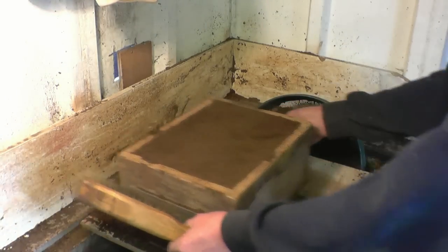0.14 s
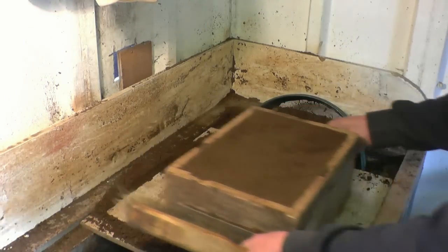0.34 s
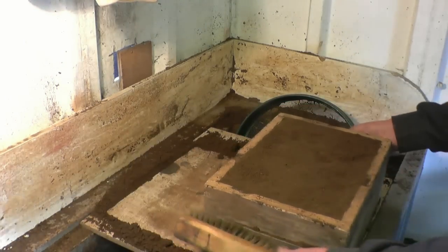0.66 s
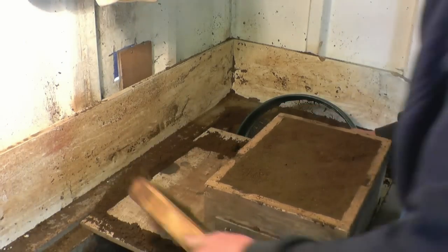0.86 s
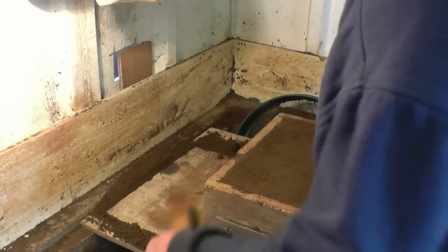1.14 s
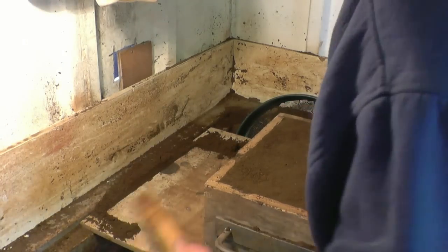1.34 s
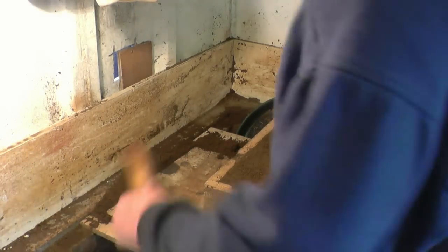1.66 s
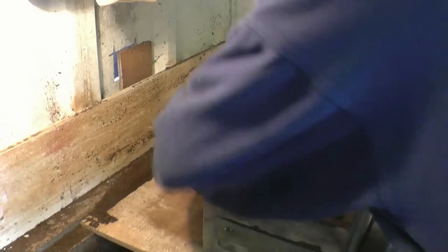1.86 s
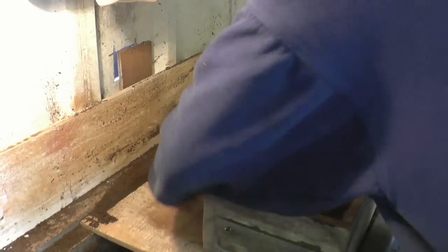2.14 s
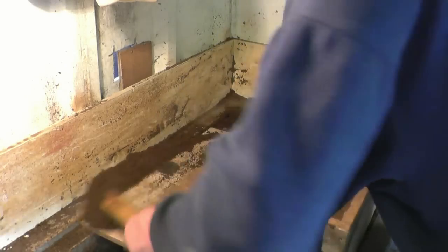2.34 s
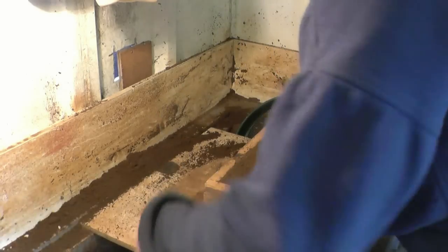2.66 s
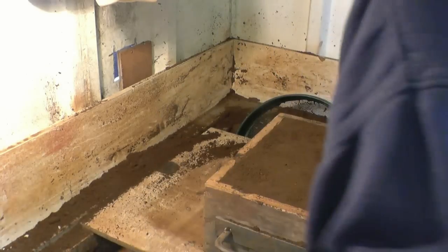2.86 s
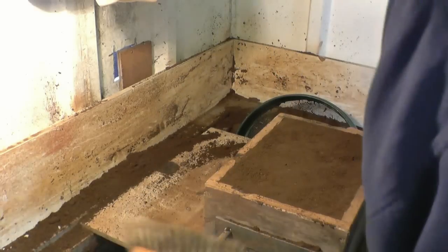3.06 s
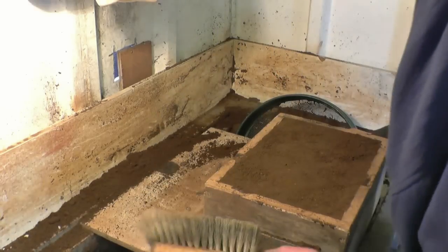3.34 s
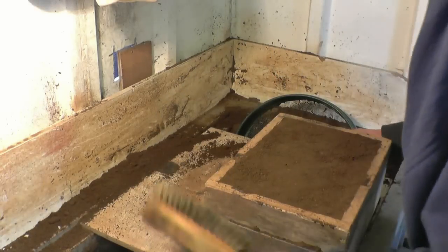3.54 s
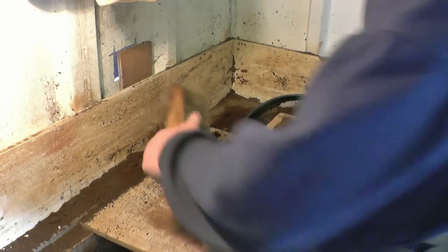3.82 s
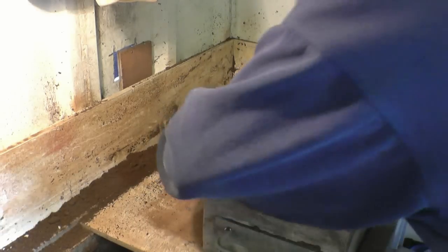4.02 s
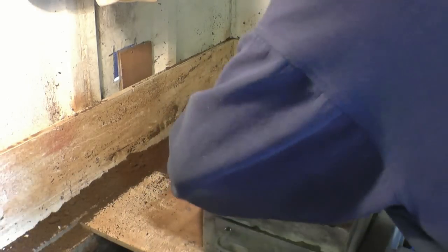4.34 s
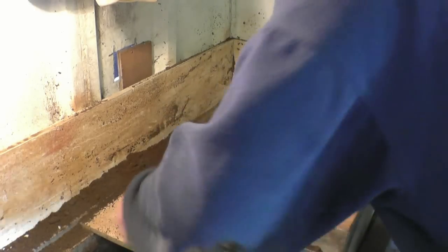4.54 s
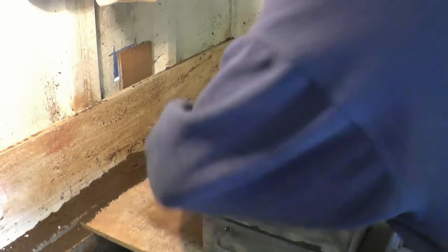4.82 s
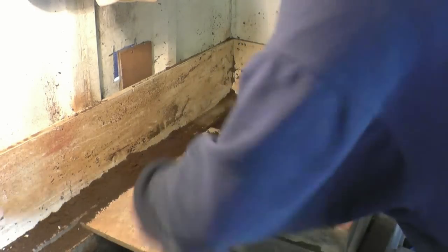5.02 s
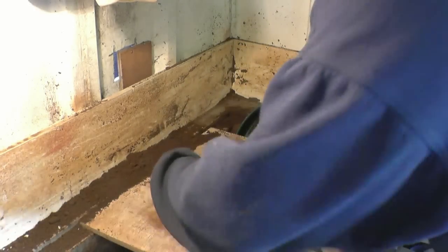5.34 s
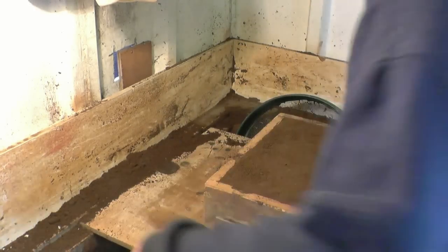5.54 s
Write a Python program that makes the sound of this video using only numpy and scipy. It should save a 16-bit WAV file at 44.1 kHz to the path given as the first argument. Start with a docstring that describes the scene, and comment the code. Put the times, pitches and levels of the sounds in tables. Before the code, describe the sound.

A heavy sand-filled wooden box judders across a gritty board, then a hand brush knocks and sweeps loose sand in short strokes.

```python
"""Sandbox drag and hand brush on a board

A sand-filled wooden box is dragged across a board on a bench; a hand brush then knocks and sweeps spilt sand.
Decaying modes ring for board, bench and brush back; filtered random grains hiss, rasp and rumble.
A faint rustle, lone snaps and a thin whine join in; a small walled alcove echoes to a close microphone pair."""
import sys
import numpy as np
from scipy import signal
from scipy.fft import rfft, irfft, next_fast_len
from scipy.io import wavfile
from scipy.ndimage import uniform_filter1d, map_coordinates

SR = 44100
rng = np.random.default_rng(int(sys.argv[2]) if len(sys.argv) > 2 else 0)


def dump(signal):
    """Clip the signal to [-1, 1] and save it as 16-bit WAV at the path in sys.argv[1]."""
    limited = np.clip(np.atleast_2d(signal).T, -1, 1)
    pcm = np.round(limited * 32767).astype(np.int16)
    wavfile.write(sys.argv[1], SR, pcm)


N = 250929
TIME_S = np.arange(N) / SR

# ringing modes of bench, board, brush back and box side walls: mode_hz, level_db, free_t60_s
BENCH_MODES = [(65.1, 0, 0.35)]
BOARD_LOW_MODES = [(145.9, -3.5, 0.47), (183.7, 9.5, 0.083)]
BOARD_MID_MODES = [(218.6, -15.5, 0.39), (266.9, -1, 0.24), (303.6, -5.5, 0.14)]
BOARD_HIGH_MODES = [(381.4, -6.5, 0.15), (513, -7, 0.11), (573, -3, 0.064), (696, -10, 0.06),
                    (1080, -7, 0.02)]
BRUSH_BACK_MODES = [(1190, -1.5, 0.044), (1752, 4, 0.02), (2047, 0, 0.042), (2367, -10, 0.051),
                    (2740, -9, 0.032), (3142, -5, 0.043), (3603, -5, 0.058)]
BOX_WALL_MODES = [(655, -3, .07), (790, 0, .09), (1000, -9, .05), (1250, -6, .06), (1420, -9, .06)]
# brush knocks: start_s, crack_db, bench_db, board_low_db, board_mid_db, board_high_db, brush_back_db, free_ring_s
KNOCKS = [(1.1863, -33, -67, -45, -22, -34, -38, 0.097), (1.4121, -56, -71, -46, -45, -52, -75, 0.15),
          (1.4759, -50.5, -68, -45, -41, -44, -77, 0.046), (1.5521, -34.5, -47, -47, -19, -27, -34.5, 0.15),
          (2.0838, -35.5, -26.5, -15.5, -19, -27, -31, 0.09), (2.632, -75, -70, -53, -53, -57, -75, 0.07),
          (2.755, -62, -75, -70, -39, -39, -48, 0.12), (2.791, -60, -75, -71, -42, -47, -53, 0.016),
          (2.816, -65, -75, -69, -40, -50, -59, 0.087), (2.925, -60, -86, -61, -43, -59, -50, 0.18),
          (3.3861, -60, -49, -56.5, -56.5, -39.5, -60, 0.074),
          (3.6523, -74, -71, -56, -45.5, -43.5, -67, 0.12),
          (4.2044, -36.5, -33, -40, -45.5, -28.5, -37.5, 0.11),
          (4.383, -50, -78, -74, -76, -46, -50, 0.091), (4.5038, -29.5, -24, -12, -10, -15, -32, 0.097),
          (4.765, -50, -80, -59, -73, -35.5, -51.5, 0.105),
          (5.015, -39.5, -58, -33.5, -49, -42, -40.5, 0.13),
          (5.0283, -54, -34, -44, -35, -35, -42.5, 0.059), (5.0832, -60, -40.5, -51, -39.5, -35, -57, 0.13),
          (5.497, -40, -62, -69, -32, -36, -39, 0.068), (5.5195, -63, -39, -71, -46, -37, -41, 0.19)]
# sliding box: time_s, board_low_db, board_mid_db, hiss_db, rasp_db, rumble_db
DRAG = [(0.05, -71, -91, -85, -69, -66), (0.11, -38, -41, -49.5, -47, -43),
        (0.17, -28.5, -29.5, -46.5, -41.5, -34), (0.21, -22.5, -34, -44, -38, -29),
        (0.274, -12.5, -24, -41.5, -36.5, -26.5), (0.31, -22, -22.5, -42.5, -35, -27.5),
        (0.356, -29, -25, -42, -34.5, -28), (0.384, -31.5, -20.5, -42.5, -36, -26),
        (0.46, -36, -26.5, -40.5, -33, -24.5), (0.54, -29.5, -19, -42, -35.5, -30.5),
        (0.575, -29, -32, -42.5, -37, -29.5), (0.68, -33.5, -36.5, -45.5, -47, -39.5),
        (0.73, -42, -50, -61.5, -60, -56), (0.86, -85, -56, -85, -79, -74)]
# brush strokes and scuffs: touch_s, rise_s, hold_s, lift_s, hiss_db, dust_over_hiss_db, rasp_db, rumble_db
STROKES = [(0.659, 0.12, 0.1, 0.08, -56, -5.5, -57, -68),
           (0.877, 0.051, 0.027, 0.089, -44, -10, -40.5, -40),
           (1.099, 0.014, 0.01, 0.056, -64.5, 2, -74, -61), (1.138, 0.13, 0.047, 0.1, -53, -8, -53, -72),
           (1.387, 0.033, 0.015, 0.08, -51.5, 5.5, -75.5, -48.5),
           (1.522, 0.03, 0.12, 0.11, -52.5, -6.5, -58, -53.5),
           (1.901, 0.081, 0.057, 0.067, -59.5, -2.5, -70, -74),
           (2.006, 0.22, 0.29, 0.057, -45.5, -10, -49, -52.5),
           (2.666, 0.068, 0.20, 0.11, -50, -6, -61, -58), (2.704, 0.034, 0.036, 0.14, -68, -10, -49, -50),
           (3.587, 0.039, 0.021, 0.087, -66, 1.5, -65, -53),
           (3.657, 0.041, 0.062, 0.068, -63.5, -12, -70, -69),
           (3.858, 0.075, 0.023, 0.071, -64.5, -4.5, -81, -73),
           (4.015, 0.056, 0.028, 0.04, -61, -7.5, -60.5, -57),
           (4.11, 0.014, 0.078, 0.023, -52, -5, -63, -62), (4.17, 0.033, 0.076, 0.045, -53, -3, -60, -54),
           (4.294, 0.017, 0.08, 0.17, -62, -7, -60, -59.5),
           (4.496, 0.032, 0.16, 0.092, -49, -3.5, -63, -52.5),
           (4.757, 0.02, 0.015, 0.073, -62, -7, -58.5, -56),
           (4.814, 0.052, 0.032, 0.18, -65.5, -12, -65.5, -75),
           (4.975, 0.14, 0.075, 0.12, -43.5, -8, -56.5, -57),
           (5.006, 0.017, 0.056, 0.075, -56, -4, -50, -41), (5.441, 0.02, 0.15, 0.26, -50, -6, -56.5, -59)]
# faint rustle between strokes: time_s, hiss_db, rasp_db, rumble_db, hollow_ring_db
RUSTLE = [(0.0, -63, -61.5, -54, -59), (1.05, -68.5, -58, -59, -76), (1.8, -67.5, -69, -55.5, -61.5),
          (2.5, -71, -59, -56.5, -69), (2.6, -66.5, -69.5, -62, -78.5), (2.8, -61, -64.5, -56.5, -74),
          (3.25, -67.5, -56.5, -59, -58), (3.5, -67, -69.5, -62, -73), (4.4, -71, -78, -74, -81),
          (5.25, -69, -63, -54.5, -54.5), (5.42, -69.5, -65, -58.5, -55.5), (5.49, -82, -56, -50, -44.5),
          (5.69, -68, -69, -52.5, -69)]
# snaps of lone grains or bristles: start_s, level_db
TICKS = [(3.548, -45.5), (4.367, -37)]
# bristles bite: peak_s, rise_s, fading_s, level_db
SCRATCHES = [(2.741, 0.012, 0.01, -45), (4.13, 0.0076, 0.012, -46.5)]
# thin whines: start_s, level_db
WHINES = [(0.7, -69), (3.3, -73)]
# spectra of fine sand, finest dust, coarse sand, sand pressed on the board, shop murmur: freq_hz, level_db
HISS_SPECTRUM = [(2500, -8), (4500, 3), (6000, 3.5), (8000, -4.5), (11000, -37), (16000, -71)]
DUST_SPECTRUM = [(6000, -23.5), (8500, -3), (12000, -4), (16000, -20.5)]
RASP_SPECTRUM = [(500, 7), (1000, 8), (2000, 1), (3500, -1), (6000, -8), (16000, -28)]
PRESS_SPECTRUM = [(40, -41), (200, -6.5), (380, 12.5), (600, 9), (900, 2), (1600, -37), (8000, -57)]
SHOP_SPECTRUM = [(18, -31), (30, 0), (69, 10.5), (182, -1), (324, 7.5), (455, -6.5), (945, 1.5),
                 (2360, -18), (6210, -52), (15500, -49)]
# bass a small board fails to radiate: freq_hz, gain_db
THIN_BOARD = [(25, -55), (60, -40), (100, -24), (135, 0.5)]
# microphone housing dips: centre_hz, half_width_hz (to 1/e of the dB depth), gain_db
HOUSING_DIPS = [(4500, 540, -9), (7850, 560, -8.5)]
# stereo side signal: freq_hz, side_gain_db
SIDE_WIDTH = [(60, -19.5), (110, -9), (200, -16), (380, -15), (700, -9.5), (1290, -7), (2380, -9),
              (4400, -14), (8120, -0.5), (15000, -0.5)]
# stereo balance: freq_hz, left_minus_right_db
LEAN = [(300, -0.5), (1000, 1.5), (4000, 0.9), (12000, -0.5)]

SHOP_DB = -63
ALCOVE_T60_S, ALCOVE_DB = 0.091, -9
ALCOVE_LOW_HZ = 450  # light walls return little bass
TOP_HZ = 15700
SETTLED_DB = -12  # ring change once the bristles rest on the board
SLOW_BASS_S = 0.0018  # long bending waves travel slowest and start the low modes late
DRAG_DUST_OVER_HISS_DB, RUSTLE_DUST_OVER_HISS_DB = -10, -6
STROKE_EDGE_DB = -23.5  # a stroke starts from and dies to this
SWELL_DB_PER_S = 3.5  # hiss and dust grow while the bristles speed up
# knocks scatter coarse sand: rasp over brush back, rumble over board high
SCATTER_RASP_DB, SCATTER_RUMBLE_DB, SCATTER_FADE_S = -8.5, -15, 0.036
TICK_FADE_S = 0.0018
SHIFT_S = 0.00125  # timing wander per unit of walk
SCRATCH_HISS = 0.88
WHINE_HZ, WHINE_S = 11760, 0.21
SLIDE_END_HZ, SLIDE_DROP_HZ, SLIDE_S = 11524.8, 3740, 0.09


def undb(db):
    """Decibels to gain."""
    return 10 ** (np.asarray(db) / 20)


def unit(x):
    """Scale to rms 1."""
    return x / np.sqrt(np.mean(x ** 2))


def shape(x, points):
    """Filter by (Hz, dB) points joined on a log-frequency axis."""
    hz, db = np.transpose(points)
    size = next_fast_len(N)
    log_f = np.log(np.maximum(np.arange(size // 2 + 1) * SR / size, 1))
    gain = undb(np.interp(log_f, np.log(hz), db))
    return irfft(rfft(x, size) * gain, size)[..., :N]


def noise(points):
    """White noise given a spectrum, rms 1."""
    return unit(shape(rng.standard_normal(N), points))


def walk(rate_hz):
    """Random levels held 1 / rate_hz and slewed twice; rms near 0.66."""
    hold = int(SR / rate_hz)
    steps = np.repeat(rng.standard_normal(N // hold + 1), hold)
    return 0.89 * uniform_filter1d(uniform_filter1d(steps, hold), hold)[:N]


def curves(table):
    """Gains over time from the dB columns of a table; -120 dB outside it."""
    s, *columns = np.transpose(table)
    return [undb(np.interp(TIME_S, s, c, left=-120, right=-120)) for c in columns]


def joined(*gains):
    """Unrelated sounds add in power."""
    return np.sqrt(sum(g ** 2 for g in gains))


def decaying(kicks, fade_s):
    """Each kick jumps, then falls by 1/e per fade_s."""
    return signal.lfilter([1], [1, -np.exp(-1 / (fade_s * SR))], kicks)


def highpass(x, order, hz):
    """Butterworth high-pass."""
    return signal.sosfilt(signal.butter(order, hz, "high", fs=SR, output="sos"), x)


def pole(x, hz, t60_s):
    """One decaying rotation at hz."""
    return signal.lfilter([1], [1, -np.exp((2j * np.pi * hz - np.log(1000) / t60_s) / SR)], x)


def grains(rate_hz, scatter_db):
    """Single grains slipping at random moments with uneven size, rms 1."""
    slips = rng.random(N) < rate_hz / SR
    sizes = rng.standard_normal(N) * undb(scatter_db * rng.standard_exponential(N))
    return unit(slips * sizes)


def rubbed(modes, t60_factor, rate_hz):
    """Stick-slip jolts drive the modes; a load shortens their ring; rms 1."""
    jolts = grains(rate_hz, scatter_db=1.0)
    out = 0
    for k, (hz, db, t60_s) in enumerate(modes):
        ring = pole(jolts, hz, t60_s * t60_factor).imag / np.sqrt(t60_s)
        out = out + (-1) ** k * undb(db) * ring
    return unit(out)


def strokes():
    """Gains of hiss, dust, rasp and rumble: each stroke rises, holds and lifts off."""
    power = np.zeros((4, N))
    for s, rise_s, hold_s, lift_s, hiss_db, dust_db, rasp_db, rumble_db in STROKES:
        corners_s = s + np.cumsum(np.abs([0, rise_s, hold_s, lift_s]))
        corners_db = [STROKE_EDGE_DB, 0, 0, STROKE_EDGE_DB]
        db = np.interp(TIME_S, corners_s, corners_db, left=-120, right=-120)
        swell_db = SWELL_DB_PER_S * np.minimum(TIME_S - corners_s[2], 0)
        stroke_hiss_db = db + hiss_db + swell_db
        power += undb([stroke_hiss_db, stroke_hiss_db + dust_db, db + rasp_db, db + rumble_db]) ** 2
    return np.sqrt(power)


def scattered(db):
    """Gain that jumps at each knock and fades as the thrown sand settles."""
    kicks = np.zeros(N)
    kicks[(np.transpose(KNOCKS)[0] * SR).astype(int)] = undb(db) ** 2
    return np.sqrt(decaying(kicks, SCATTER_FADE_S / 2))  # power fades twice as fast


def sand_levels():
    """Gains of the four sand layers from drag, strokes, knocks and rustle."""
    hiss, dust, rasp, rumble = strokes()
    _, _, drag_hiss, drag_rasp, drag_rumble = curves(DRAG)
    low_hiss, low_rasp, low_rumble, _ = curves(RUSTLE)
    _, _, _, _, _, high_db, back_db, _ = np.transpose(KNOCKS)
    drag_dust = drag_hiss * undb(DRAG_DUST_OVER_HISS_DB)
    low_dust = low_hiss * undb(RUSTLE_DUST_OVER_HISS_DB)
    return (joined(hiss, drag_hiss, low_hiss),
            joined(dust, drag_dust, low_dust),
            joined(rasp, drag_rasp, low_rasp, scattered(back_db + SCATTER_RASP_DB)),
            joined(rumble, drag_rumble, low_rumble, scattered(high_db + SCATTER_RUMBLE_DB)))


def sand():
    """Fine grains hiss, coarse ones rasp on the brush and rumble through the board; the shop murmurs behind."""
    hiss, dust, rasp, rumble = sand_levels()
    slips = grains(14000, scatter_db=-0.9) * undb(2.0 * walk(24.8))
    fine = hiss * unit(shape(slips, HISS_SPECTRUM))
    fine = fine + dust * undb(1.8 * walk(19)) * unit(shape(slips, DUST_SPECTRUM))

    coarse = unit(shape(grains(4000, scatter_db=-0.5), RASP_SPECTRUM))
    coarse = coarse + 0.38 * rubbed(BRUSH_BACK_MODES, t60_factor=0.98, rate_hz=3000)

    board = unit(shape(grains(2500, scatter_db=2.0), PRESS_SPECTRUM))
    board = board + 0.5 * rubbed(BOARD_HIGH_MODES, t60_factor=0.32, rate_hz=1500)
    board = board + 0.57 * rubbed(BOARD_MID_MODES[1:2], t60_factor=1.0, rate_hz=820)

    rasping = rasp * undb(1.5 * walk(25)) * unit(coarse)
    rumbling = rumble * undb(1.5 * walk(20)) * unit(board)
    shop = noise(SHOP_SPECTRUM) * undb(SHOP_DB + 0.8 * walk(4))
    return fine + shape(rasping + rumbling, THIN_BOARD) + shop


def hollow():
    """Light scuffing sounds the side walls of the box."""
    level = curves(RUSTLE)[3] * undb(2.5 * walk(15))
    return level * rubbed(BOX_WALL_MODES, t60_factor=1, rate_hz=1500)


def drag():
    """The heavy box judders over loose sand in lurches and shakes the board, whose modes shift under it."""
    low, mid, _, _, rumble = curves(DRAG)
    judder = low * rubbed(BOARD_LOW_MODES, t60_factor=0.58, rate_hz=900)
    judder = judder + mid * rubbed(BOARD_MID_MODES, t60_factor=0.38, rate_hz=1200)
    high = 0.73 * rumble * undb(2.8 * walk(28.9))
    judder = judder + high * rubbed(BOARD_HIGH_MODES[:3], t60_factor=0.92, rate_hz=900)
    # the moving load detunes the board: slow timing wander
    wandering_s = TIME_S + SHIFT_S * walk(12)
    judder = map_coordinates(judder, [wandering_s * SR], mode="mirror")
    return shape(judder, THIN_BOARD)


def whine():
    """A tone slides down beside a steady one that grows in, both wavering."""
    out = 0
    for s, db in WHINES:
        t = np.clip(TIME_S - s, 0, WHINE_S)
        slide_turns = SLIDE_END_HZ * t - SLIDE_DROP_HZ * SLIDE_S * np.exp(-t / SLIDE_S)
        sliding = 0.5 * np.sin(2 * np.pi * slide_turns)
        steady = t / WHINE_S * np.sin(2 * np.pi * WHINE_HZ * t)
        envelope = np.abs(np.sin(np.pi * t / WHINE_S))
        out = out + undb(db + 3 * walk(40)) * envelope * (sliding + steady)
    return out


def struck(modes, db, turns, free_s, scatter_db, detune):
    """Rings, a row per blow: modes build over some turns as the bending wave spreads, neighbours opposed, then fade."""
    t = np.arange(int(0.5 * SR)) / SR
    out = np.zeros((len(db), len(t)))
    for k, (hz, mode_db, t60_s) in enumerate(modes):
        chance = rng.standard_normal((len(db), 2))
        build = (1 - np.exp(-t * hz / turns)) ** 2
        fade = np.exp(-np.log(1000) * t / t60_s)
        wave = (-1) ** k * np.sin(2 * np.pi * hz * (1 + detune * chance[:, 1:]) * t)
        out += undb(mode_db + scatter_db * chance[:, :1]) * build * fade * wave
    settling = np.clip((t - free_s[:, None]) / 0.025, 0, 1)
    return out * undb(db[:, None] + SETTLED_DB * settling)


def knocks():
    """The wooden brush back meets the board: a crack of sand, then brush, board and bench ring."""
    s, crack_db, bench_db, low_db, mid_db, high_db, back_db, free_s = np.transpose(KNOCKS)
    # the two lowest mode families swing against each other at the struck spot
    board = (struck(BOARD_MID_MODES, mid_db, 0.39, free_s, scatter_db=1.35, detune=0.0032)
             - struck(BOARD_LOW_MODES, low_db, 0.45, free_s, scatter_db=1.3, detune=0.0052))
    board = highpass(board, 2, 95)  # sound below the lowest board mode cancels around the edges
    # the bench rings on under the bristles
    bench = struck(BENCH_MODES, bench_db, 1.5, free_s + 0.5, scatter_db=1, detune=0.02)
    rings = np.roll(board + bench, int(SLOW_BASS_S * SR), axis=1)
    rings = rings + struck(BOARD_HIGH_MODES, high_db, 1.0, free_s, scatter_db=2.5, detune=0.024)
    rings = rings + struck(BRUSH_BACK_MODES, back_db, 1.0, free_s, scatter_db=2.5, detune=0.0255)

    t = np.arange(rings.shape[1]) / SR
    spray = shape(rng.standard_normal(N), HISS_SPECTRUM)
    spray = unit(spray + 0.46 * shape(rng.standard_normal(N), DUST_SPECTRUM))
    spray_fade = np.exp(-t / 0.0097)
    splinter, splinter_fade = noise(RASP_SPECTRUM), np.exp(-t / 0.015)
    gravel = noise(PRESS_SPECTRUM)
    gravel_fade = (1 - np.exp(-t / 0.0012)) * np.exp(-t / 0.016)

    out = np.zeros(N + len(t))
    starts = (s * SR).astype(int)
    for at, ring, crack, back, high in zip(starts, rings, undb(crack_db), undb(back_db), undb(high_db)):
        piece = slice(at // 2, at // 2 + len(t))  # own stretch of noise per knock
        burst = crack * spray[piece] * spray_fade
        burst = burst + 0.45 * back * splinter[piece] * splinter_fade
        burst = burst + 0.34 * high * gravel[piece] * gravel_fade
        out[at:at + len(t)] += ring + burst
    return out[:N]


def scratches():
    """Bristles bite and sound two modes of the brush back under a spit of sand."""
    gain = 0
    for s, rise_s, fading_s, db in SCRATCHES:
        slope = np.where(TIME_S < s, (TIME_S - s) / rise_s, (s - TIME_S) / fading_s)
        gain = gain + undb(db) * np.exp(slope)
    upper = rubbed(BRUSH_BACK_MODES[-1:], t60_factor=0.4, rate_hz=3000)
    lower = rubbed(BRUSH_BACK_MODES[2:3], t60_factor=0.41, rate_hz=3100)
    return gain * (upper + 0.49 * lower + SCRATCH_HISS * noise(HISS_SPECTRUM))


def ticks():
    """Lone grains or bristles snap: very short bright noise bursts."""
    s, db = np.transpose(TICKS)
    kicks = np.zeros(N)
    kicks[(s * SR).astype(int)] = undb(db)
    return decaying(kicks, TICK_FADE_S) * noise(HISS_SPECTRUM)


def echoes(x, t60_s):
    """Dense reflections from the near walls: a short fading noise as response."""
    t = np.arange(int(0.4 * SR)) / SR
    fade = np.exp(-np.log(1000) * t / t60_s) * np.minimum(t / 0.0015, 1)
    tail = rng.standard_normal(len(t)) * fade
    return signal.fftconvolve(x, tail / np.sqrt(np.sum(tail ** 2)))[:N]


def scene():
    """Sources echo in the alcove; grains spread over the board reach the two ports differently in the treble."""
    wood = hollow() + drag() + whine() + knocks() + scratches() + ticks()
    near = wood + sand()
    mid = near + undb(ALCOVE_DB) * highpass(echoes(near, ALCOVE_T60_S), 3, ALCOVE_LOW_HZ)
    # a second, independent draw of sand widens the image
    side = shape(echoes(wood, t60_s=0.12) + sand(), SIDE_WIDTH)
    lean = np.array(LEAN)
    left = shape(mid + side, lean * [1, 0.5])
    right = shape(mid - side, lean * [1, -0.5])
    return np.array([left, right])


def record(dry):
    """The housing dips two treble bands; the recorder cuts the top."""
    size = next_fast_len(N)
    f = np.arange(size // 2 + 1) * SR / size
    dips_db = sum(db * np.exp(-((f - hz) / half_width_hz) ** 2) for hz, half_width_hz, db in HOUSING_DIPS)
    heard = irfft(rfft(dry, size) * undb(dips_db), size)[:, :N]
    return signal.sosfilt(signal.ellip(10, 0.2, 80, TOP_HZ, fs=SR, output="sos"), heard)


dry = scene()
out = record(dry)
dump(out)
```